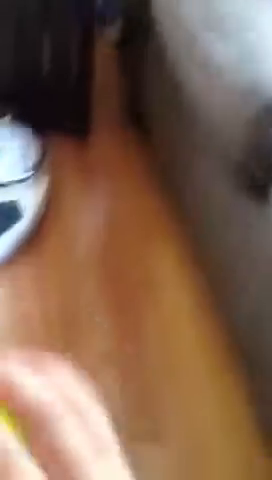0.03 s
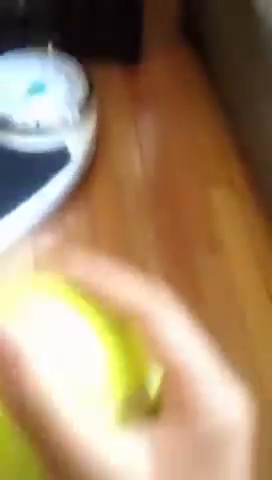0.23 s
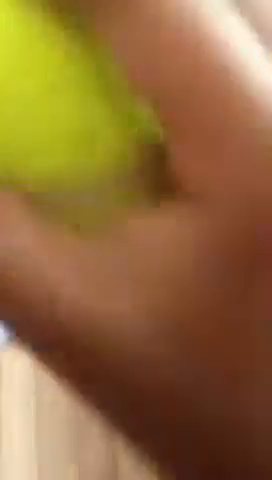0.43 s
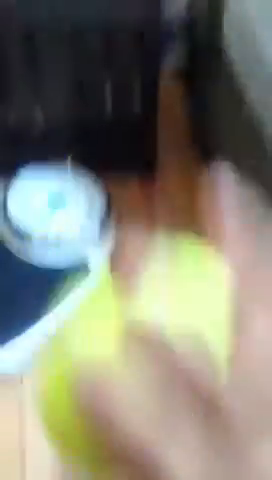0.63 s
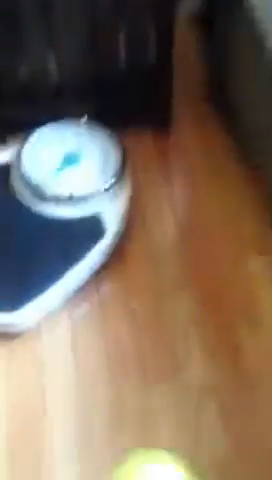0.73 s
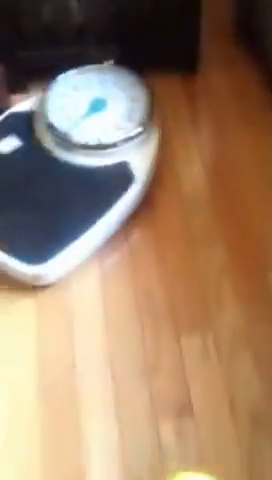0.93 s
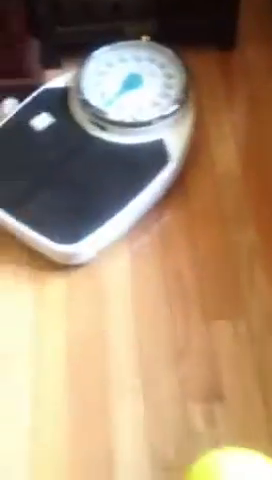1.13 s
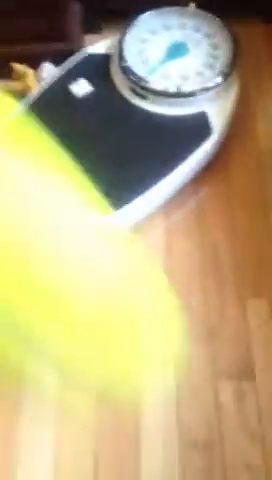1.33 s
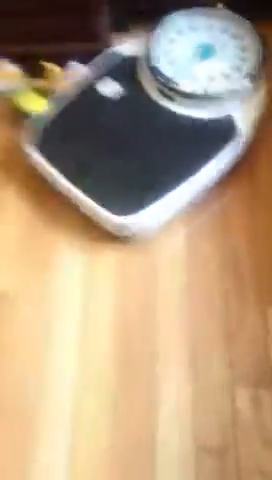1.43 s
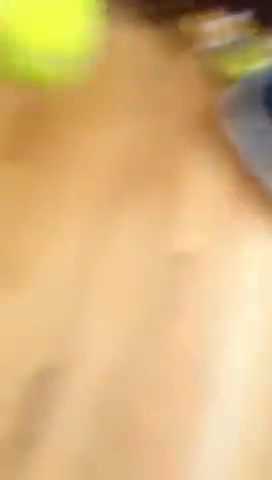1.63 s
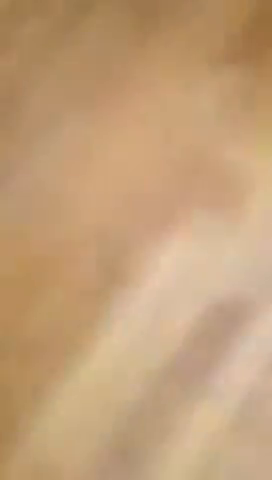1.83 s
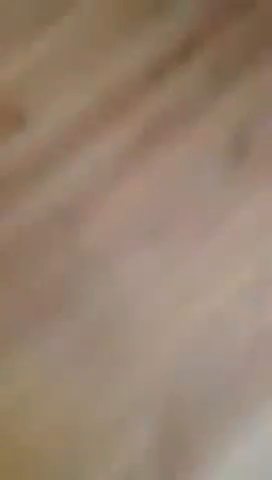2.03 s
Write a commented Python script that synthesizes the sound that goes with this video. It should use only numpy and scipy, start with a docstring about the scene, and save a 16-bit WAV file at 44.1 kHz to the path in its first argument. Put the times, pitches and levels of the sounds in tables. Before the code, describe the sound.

After faint rustling, a tennis ball cracks against a wooden floor, then again a second later, slightly softer; a faint creak comes between and small grip clicks follow, all in a lively indoor room, close microphone.

```python
"""A felt ball lands twice on a wooden floor: each impact is a sharp snap of short tone bursts, sets low modes
swelling and decaying as a sum, scuffs its felt as fading noise and returns as wall echoes and reverberation.
Around it, noise under drawn envelopes makes cloth rustle and finger brushes; tone bursts make the knocks and
ticks of a gripping hand; uneven slips exciting a resonance make a creak; low-weighted noise is the quiet room."""
import sys
import numpy as np
from scipy import signal
from scipy.fft import rfft, irfft, next_fast_len
from scipy.io import wavfile
from scipy.ndimage import uniform_filter1d, map_coordinates

SR = 44100
rng = np.random.default_rng(int(sys.argv[2]) if len(sys.argv) > 2 else 0)


def natural_amplitude(level_db):
    """Convert a level in decibels to a linear amplitude factor, elementwise."""
    exponent = np.asarray(level_db, float) / 20
    return 10 ** exponent


def int16_out(signal):
    """Quantize to a 16-bit WAV file."""
    q = np.round(np.clip(np.atleast_2d(signal).T, -1, 1) * 32767)
    wavfile.write(sys.argv[1], SR, q.astype(np.int16))


N = 91287


def unit(x):
    """Normalisation: scale a signal to rms 1."""
    return x / np.sqrt(np.mean(x ** 2) + 1e-20)


def along(points, hz):
    """Spectral interpolation: read (frequency [Hz], value) points on a logarithmic frequency axis."""
    f, value = np.transpose(points)
    return np.interp(np.log(hz + 1), np.log(f + 1), value)


def curve(points):
    """Envelope interpolation: read (time [s], value) points at each sample."""
    return np.interp(np.arange(N) / SR, *np.transpose(points))


def filtered(x, response):
    """Linear filtering: multiply the spectrum of x by a response of frequency."""
    size = next_fast_len(len(x) + 8192)
    hz = np.fft.rfftfreq(size, 1 / SR)
    return irfft(rfft(x, size) * response(hz), size)[:len(x)]


def hiss(spectrum):
    """Friction as coloured noise: random gain patches in time and frequency, then a spectrum, at rms 1."""
    patchy_db = 1.2
    cells = signal.stft(rng.standard_normal(N + 512), nperseg=512)[2]
    field = rng.standard_normal(cells.shape)
    field = uniform_filter1d(field, size=6, axis=0)
    field = uniform_filter1d(field, size=8, axis=1)
    noise = signal.istft(cells * natural_amplitude(patchy_db * unit(field)), nperseg=512)[1][:N]
    return unit(filtered(noise, lambda hz: natural_amplitude(along(spectrum, hz))))


def blip(s, db, hz, width_s, lean=0):
    """Short impact: a cosine with phase lean [rad] under a Gaussian of standard deviation width_s."""
    t = np.arange(N) / SR - s
    bell = np.exp(-.5 * (t / width_s) ** 2)
    return natural_amplitude(db) * np.cos(2 * np.pi * hz * t + lean) * bell


def hush():
    """Background of a quiet room: steady broadband noise weighted to the low frequencies."""
    # noise colour: (frequency [Hz], density [dB per Hz])
    colour = [(40, -26), (80, -11.5), (120, 3.5), (250, 0.5), (500, -2.5), (800, -12), (1500, -13.5),
              (3000, -19.5), (6500, -23), (10000, -28.5), (13000, -22.5), (15500, -24.5)]
    hush_db = -63.5
    return natural_amplitude(hush_db) * hiss(colour)


def cloth():
    """Cloth rustle: fibre friction as broadband noise under a slowly varying level."""
    # loudness of the rustle: (time [s], level [dB])
    rustling = [(0, -65), (.04, -69.5), (.085, -60), (.15, -66.5), (.24, -66.5), (.3, -58.5), (.37, -63),
                (.47, -67), (.53, -85.5), (1.88, -75), (1.95, -60.5), (2.07, -55.5)]
    # noise colour: (frequency [Hz], density [dB per Hz])
    colour = [(700, 1.5), (2000, -1), (4000, -2), (4700, 1.5), (6300, 4.5), (7800, -0.5), (8400, -8.5),
              (12000, -8), (15500, -17)]
    return natural_amplitude(curve(rustling)) * hiss(colour)


def bumps():
    """Handling noise: soft contacts on the case give low tone bursts."""
    # bumps: (time [s], level [dB], pitch [Hz], width [s])
    contacts = [(.005, -52.5, 250, 0.014), (1.72, -63, 60, .04), (1.728, -49.5, 200, 0.0015),
                (1.748, -50, 153, .008), (1.782, -41, 113, 0.0095), (1.796, -41, 146, 0.0017),
                (1.856, -55, 300, 0.0023)]
    return sum(blip(*contact) for contact in contacts)


def brushes():
    """Finger brushes: brief sliding friction as bright noise under Gaussian swells."""
    # strokes: (time [s], level [dB], width [s])
    strokes = [(0.588, -57.5, 0.02), (.705, -71, 0.018), (1.239, -59, 0.0093), (1.287, -61, 0.016),
               (2.06, -56.5, 0.017), (.012, -70, 0.018)]
    # noise colour: (frequency [Hz], density [dB per Hz])
    colour = [(1000, -42), (2500, -9), (6000, -1.5), (9000, 0.5), (12700, 3.5), (15500, 0.5)]
    t = np.arange(N) / SR
    swell = sum(natural_amplitude(db) * np.exp(-.5 * ((t - s) / width_s) ** 2) for s, db, width_s in strokes)
    return swell * hiss(colour)


def snap(s, db, hz):
    """Impact snap: a brief contact excites a main burst, a thin bright edge and the ball's higher shell click."""
    lean, width_s = -.75, .0002
    edge_hz, edge_db, edge_width_s = 6270, -25.5, 0.00011
    shell_hz, shell_db, shell_width_s = 4030, -14.5, 0.00026
    main = blip(s, db, hz, width_s, lean)
    edge = blip(s, db + edge_db, edge_hz, edge_width_s)
    shell = blip(s, db + shell_db, shell_hz, shell_width_s, lean)
    return main + edge + shell


def walls(spot, s, db, hz):
    """Early reflections: nearby surfaces repeat the snap, delayed by path length and weakened."""
    # one row a landing spot, one column a surface: (delay [s], ...)
    delays = [(.0013, .0035, .0066, .0108, .0157, .0176, .024),
              (.0014, .0024, .0047, .0112, .0157, .019, .027)]
    # the same rows and columns: (level relative to the snap [dB], ...)
    losses = [(-14, -13, -20, -11, -14, -19, -21), (-18, -11, -13, -12, -15, -20, -19)]
    return sum(snap(s + lag, db + loss, hz) for lag, loss in zip(delays[spot], losses[spot]))


def thump(s, mode_db):
    """Body blow: a low burst just after contact, sent only to the room to fill its bass."""
    hz, width_s, level_db = 252, .0012, -6
    return blip(s + 2 * width_s, mode_db + level_db, hz, width_s)


def room(x):
    """Reverberation: convolution with clumped diffuse noise whose decay time depends on frequency."""
    # decay: (frequency [Hz], time to fall 60 dB [s])
    decay = [(100, .55), (200, 1), (400, 0.52), (1000, 0.39), (3000, 0.42), (5000, 0.34), (8000, 0.32),
             (14000, 0.19)]
    # starting colour of the tail: (frequency [Hz], level [dB])
    colour = [(100, 17), (300, 5.5), (650, 8), (1000, 4.5), (1700, 2), (2500, -3), (4700, 3.5), (5300, 5),
              (9000, 7)]
    onset_s, grain_db, grain_rate = 0.00054, 3, 500  # grain_rate in clump values per second
    hz, t, cells = signal.stft(rng.standard_normal(SR // 2), SR, nperseg=256)
    fall_db = 60 * t / along(decay, hz)[:, None]
    tail_db = along(colour, hz)[:, None] - fall_db
    tail = signal.istft(cells * natural_amplitude(tail_db), SR, nperseg=256)[1]
    age = np.arange(len(tail)) / SR
    clumps = map_coordinates(rng.standard_normal(grain_rate), [age * grain_rate])
    tail = tail * (1 - np.exp(-age / onset_s)) * natural_amplitude(grain_db * clumps)
    return signal.fftconvolve(x, tail / np.linalg.norm(tail))[:N]


def low_modes(spot, t):
    """Modal ringing: low modes build up and decay, weighted by where the ball lands."""
    # modes: (frequency [Hz], 60 dB decay [s], level at first spot [dB], level at second spot [dB])
    modes = [(73.7, 0.22, -14, -8), (114, 0.23, -29, -13), (133, 0.42, -39, -8), (153, .32, -3, -19),
             (159.4, 0.47, -24, -11), (175.6, 0.31, -22, -1), (197.2, 0.55, -11, -10.5),
             (211.4, 0.12, -14, 7.5), (250.4, 0.27, 2, -3), (285, 0.29, -1, -11.5),
             (312.6, 0.334, -5, -15.5), (334.2, 0.23, -8, -13.5), (269, 0.035, 12, 7), (494, 0.068, -2, -7),
             (806, 0.15, -18, -13.5), (893, 0.12, -40, -11), (946, 0.064, -12.5, -11),
             (1600, 0.03, -10, -11)]
    swell_cycles = 0.37  # time constant of the build-up, in cycles of each mode
    ring = np.zeros(N)
    for hz, t60, *levels in modes:
        swell = 1 - np.exp(-t * hz / swell_cycles)
        ring += natural_amplitude(levels[spot] - 60 * t / t60) * np.sin(2 * np.pi * hz * t) * swell
    return ring


def felt(t):
    """Felt scuff: surface friction as noise that dies exponentially from the landing."""
    # noise colour: (frequency [Hz], density [dB per Hz])
    colour = [(3000, -8), (5000, 4.5), (8000, -21), (10000, -15), (15000, -26)]
    level_db, t60_s = -30, 0.0078
    return natural_amplitude(level_db - 60 * t / t60_s) * (t > 0) * hiss(colour)


def ball():
    """Impact: each landing gives direct snap, reflections, reverberation, ringing low modes and a felt scuff."""
    # landings: (time [s], snap level [dB], snap pitch [Hz], mode level [dB])
    bounces = [(.8585, -7.5, 2230, -25.5), (1.8838, -9.5, 2013, -26.5)]
    room_db, mode_lag_s = -1.5, .0002
    out = np.zeros(N)
    for spot, (s, snap_db, snap_hz, mode_db) in enumerate(bounces):
        direct = snap(s, snap_db, snap_hz)
        out += direct + walls(spot, s, snap_db, snap_hz)
        out += room(natural_amplitude(room_db) * direct + thump(s, mode_db))
        since = np.maximum(np.arange(N) / SR - s - mode_lag_s, 0)
        out += natural_amplitude(mode_db) * low_modes(spot, since) + felt(since)
    return out


def ticks():
    """Grip ticks: small sharp contacts of hand and case, with their reverberation."""
    # ticks: (time [s], level [dB], pitch [Hz])
    contacts = [(1.2266, -47, 1520), (1.2278, -48.5, 375), (2.0473, -34.5, 2670), (2.0522, -23.5, 2490),
                (2.0519, -21.5, 6500), (2.0555, -32, 2560), (2.056, -28, 6250), (2.0581, -33.5, 1600),
                (2.0685, -40, 2000), (2.0533, -40.5, 900), (2.066, -40, 218), (2.056, -38.5, 370)]
    cycles, room_db = .42, -5.5
    dry_ticks = sum(-blip(s, db, hz, cycles / hz) for s, db, hz in contacts)  # first swing is inverted
    return dry_ticks + natural_amplitude(room_db) * room(dry_ticks)


def creak():
    """Stick-slip: skin slides over the case in uneven slips that ring a small resonance, over sliding noise."""
    # loudness of the creak: (time [s], level [dB])
    creaking = [(1.34, -100), (1.37, -68), (1.45, -68), (1.56, -63), (1.65, -66.5), (1.75, -67.5),
                (1.8, -84)]
    # colour of the sliding noise: (frequency [Hz], density [dB per Hz])
    slide = [(300, -11), (500, -3), (1100, -4), (2000, -19), (2600, -14), (3100, -5), (3900, -14.5),
             (6400, -10.5), (9000, -15), (13000, -16.5), (15500, -21)]
    case_hz, case_width_hz, ring_db = 6370, 800, -5
    count, rate_hz, scatter = 230, 105, .6  # scatter is in mean slip intervals
    spread_db, slip_s = 3, .0025
    draw = rng.standard_normal((count, 2))
    when_s = (np.arange(count) + scatter * draw[:, 0]) / rate_hz
    when = (when_s * SR).astype(int).clip(0, N - 1)
    slips = np.bincount(when, natural_amplitude(spread_db * draw[:, 1]), N)
    gate = signal.fftconvolve(slips, np.exp(-np.arange(600) / SR / slip_s))[:N]
    resonance = lambda hz: np.exp(-.5 * ((hz - case_hz) / case_width_hz * 2) ** 2)
    ring = filtered(gate * rng.standard_normal(N), resonance)
    return natural_amplitude(curve(creaking)) * (natural_amplitude(ring_db) * unit(ring) + hiss(slide))


def scene():
    """Superposition: the pressures of all sources add in one channel."""
    near_hand = cloth() + bumps() + brushes() + ticks() + creak()
    return (hush() + near_hand + ball())[None]


def low_pass(x):
    """Removes everything above the highest recorded frequency."""
    return signal.sosfilt(signal.butter(12, 16010, fs=SR, output="sos"), x)


def record(dry):
    """Microphone band limits: a second-order high-pass thins deep bass and a sharp edge removes the top."""
    bass_cut_hz, top_hz = 134, 15400
    response = lambda hz: (1j * hz / (1j * hz + bass_cut_hz)) ** 2 * (hz < top_hz)
    mix = filtered(dry[0], response)[None]
    return low_pass(mix)


dry = scene()
out = record(dry)
int16_out(out)
```